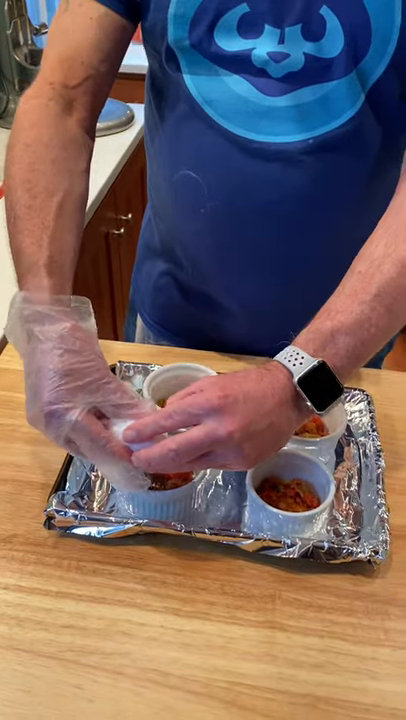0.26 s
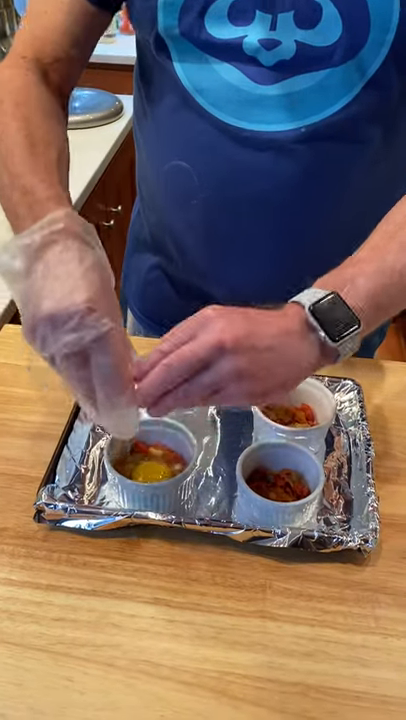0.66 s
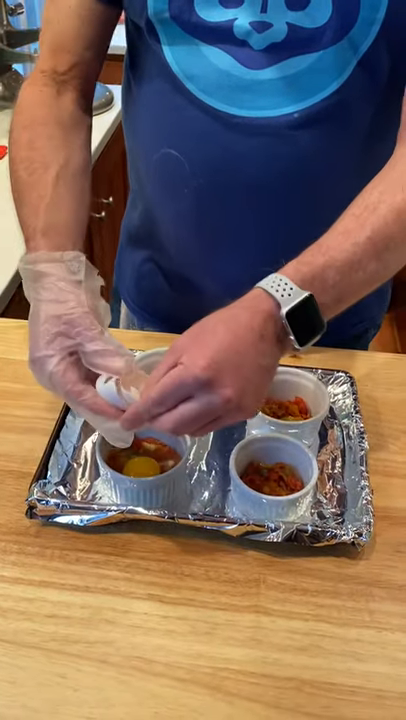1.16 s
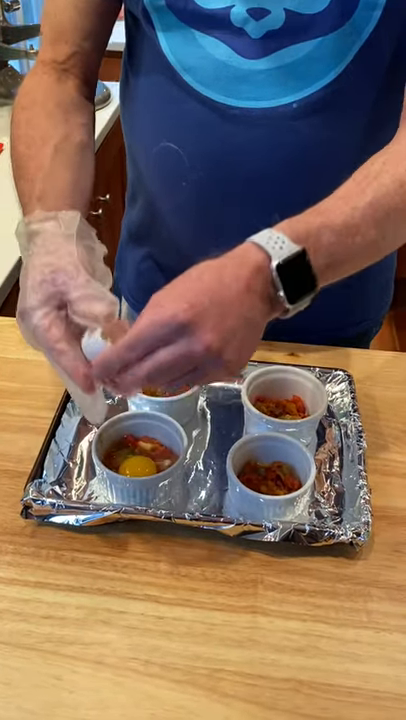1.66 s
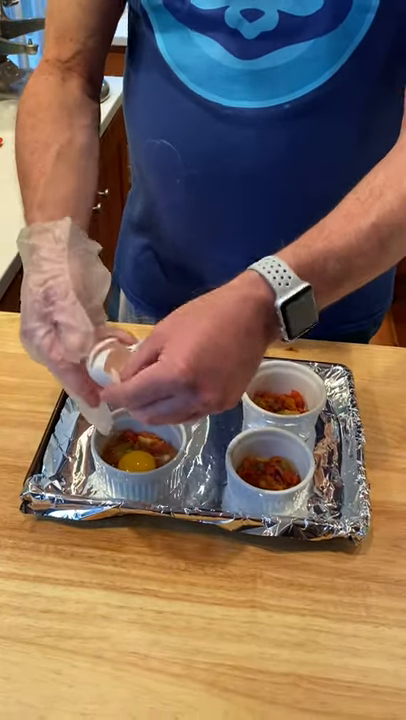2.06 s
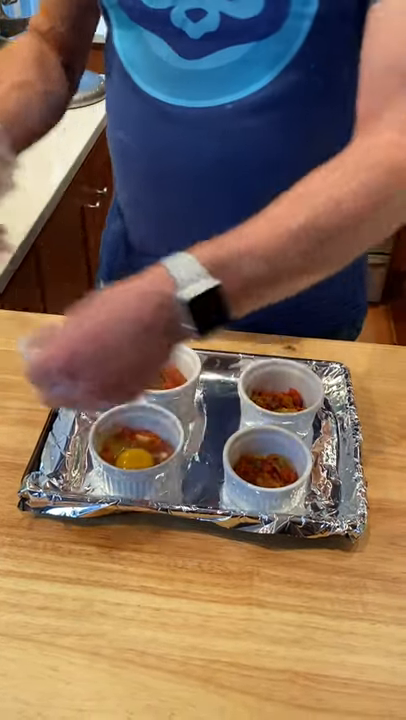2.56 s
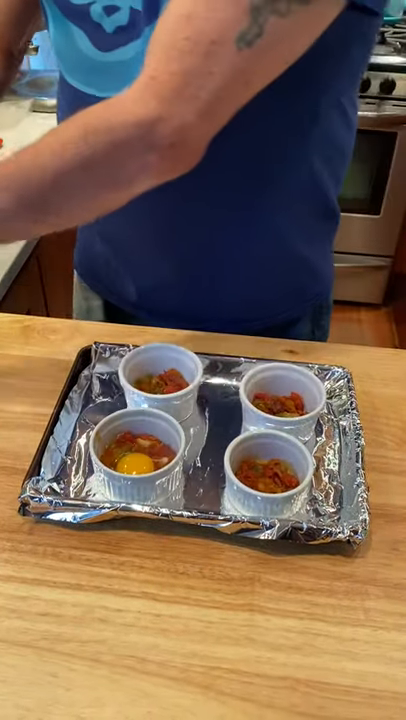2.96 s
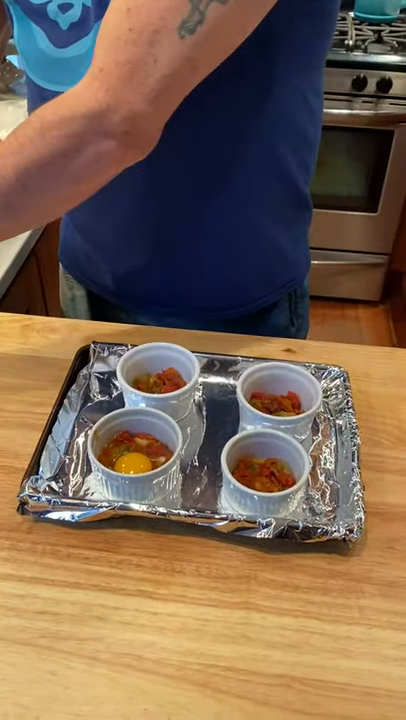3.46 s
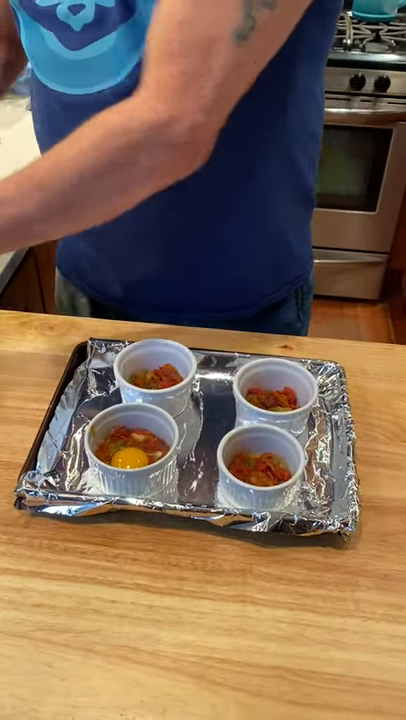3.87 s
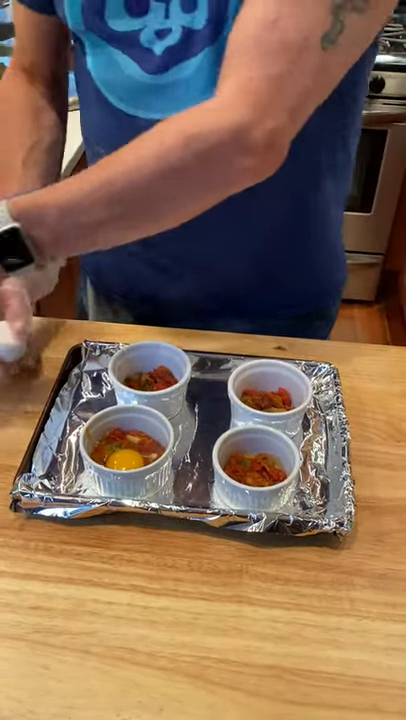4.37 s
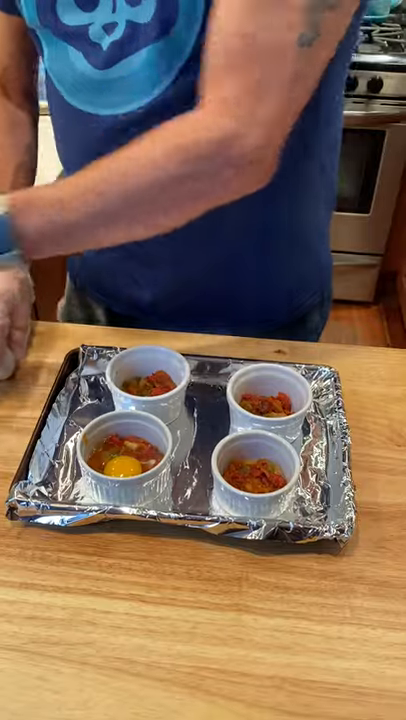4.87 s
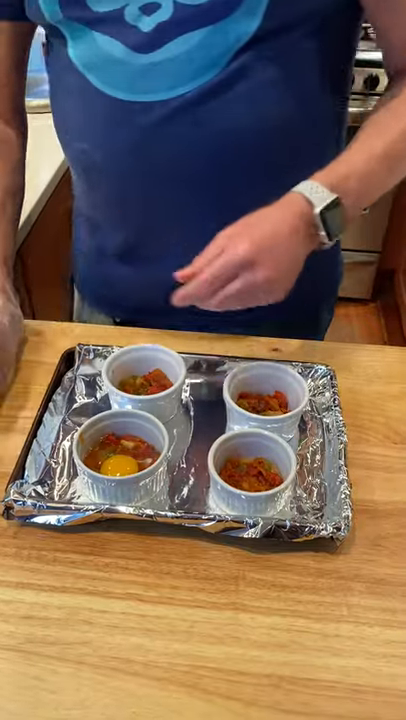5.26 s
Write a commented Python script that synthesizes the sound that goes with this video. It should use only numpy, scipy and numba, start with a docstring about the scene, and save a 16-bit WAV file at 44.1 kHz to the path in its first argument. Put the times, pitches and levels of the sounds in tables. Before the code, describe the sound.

Brittle shell crackles and a wet, rising squelch with tiny bubble pops open the scene, thinning into isolated ticks and thin plastic crinkle. After a lull the shell drops hollowly into a bowl amid cloth and glove rustle. Shell crackles again, an egg is tapped on the wooden counter, then breaks loudly at the end. Close, dry stereo pickup with short kitchen echoes over soft air noise and fridge hum.

```python
"""Opening eggs in a small kitchen

Close by, shell and glove snap (bursts ringing a hollow), egg white slurps and pops (moving resonances, rising
tones), shell drops in a bowl, and the next egg is tapped and broken on a wooden counter (struck modes).
Glove and sleeve rustle (noise and grains), the cabinet is bumped; a fridge hums (wavering sines) under room tone.
Short echoes follow the close sounds; a two-port microphone hears it all."""
import sys
import numpy as np
from scipy import signal
from scipy.fft import rfft, irfft, next_fast_len
from scipy.io import wavfile
from numba import njit

SR = 44100
rng = np.random.default_rng(int(sys.argv[2]) if len(sys.argv) > 2 else 0)


def wrap_up_sound(samples):
    """Save the sound to the file named by the first command line argument, as 16-bit audio."""
    columns = np.atleast_2d(samples).T
    # keep every value between -1 and 1, then stretch to whole-number steps
    tamed = np.clip(columns, -1, 1)
    steps = np.round(tamed * 32767).astype(np.int16)
    wavfile.write(sys.argv[1], SR, steps)


N = 243348

# Shell and glove snapping close to the microphone. Each row: time in seconds, ring peak in dB, ring pitch in Hz,
# crack peak in dB, time in seconds for the trail of smaller fractures to fall 60 dB.
SHELL_SNAPS = [(0.028, -35, 1790, -29.5, 0.011), (0.062, -35, 2050, -23, 0.02),
               (0.075, -33, 1800, -22, 0.021), (0.092, -20, 2060, -16.5, 0.048),
               (0.173, -23.5, 1900, -17.5, 0.012), (.176, -31, 1000, -41, .04),
               (0.206, -38, 1800, -20, 0.042), (0.246, -33, 1780, -21.5, 0.05),
               (0.2545, -27, 2900, -22.5, 0.043), (0.274, -21.5, 1600, -25, 0.014),
               (.281, -32, 1300, -28, 0.02), (0.416, -41, 3000, -26.5, 0.022),
               (0.44, -40, 3000, -24, 0.026), (0.477, -37, 2900, -20.5, 0.024),
               (0.7285, -37.5, 1680, -16.5, 0.046), (0.893, -33.5, 3070, -28.5, 0.058),
               (0.948, -60, 2210, -27, 0.036), (0.967, -37, 3080, -24, 0.12),
               (1.0226, -33.5, 2110, -43, 0.046), (1.0663, -48, 2130, -53, .02),
               (1.09, -42.5, 4430, -50, 0.049), (1.1646, -45, 2350, -51, 0.039),
               (1.338, -41.5, 4500, -48, 0.038), (1.403, -47, 4470, -48, 0.018),
               (1.5034, -62, 902, -34.5, 0.041), (1.8754, -51, 1650, -34.5, 0.084),
               (1.981, -46.5, 5030, -49, .015), (2.023, -65, 5000, -34.5, 0.015),
               (2.059, -52, 4570, -26, 0.024), (2.8243, -61, 3340, -30, 0.012),
               (3.303, -38, 2150, -62, 0.039), (3.466, -43, 1020, -57, 0.048),
               (3.498, -32, 1540, -56, 0.084), (3.6061, -37, 2220, -38, 0.047),
               (3.664, -40.5, 1300, -42, 0.075), (4.5998, -29.5, 2300, -24, 0.1),
               (4.604, -40, 2200, -26, .06), (4.628, -52, 2100, -39, 0.033),
               (4.6572, -25.5, 2200, -20.5, 0.05), (4.6916, -24, 2360, -24, 0.06),
               (4.695, -25.5, 3830, -23, .05), (4.702, -35, 2130, -36, 0.04),
               (4.715, -32, 2300, -35, 0.072), (4.7412, -48, 1030, -33, 0.023),
               (4.772, -41, 4500, -46, .03), (4.88, -48, 1040, -26.5, 0.035),
               (4.947, -40, 1170, -48, 0.041), (5.2342, -8, 1113, -3.5, 0.02)]
HOLLOW_T60_S, FRACTURE_RISE_S, FRACTURES_PER_S = 0.0098, 0.0012, 2200


def snaps():
    """One sharp fracture amid a dying trail of smaller, uneven ones rings the shell's hollow and cracks in the treble."""
    out, t = np.zeros(N), np.arange(4000) / SR
    treble = signal.butter(1, [2600, 8000], "band", fs=SR)
    for s, ring_db, hz, crack_db, trail_t60 in SHELL_SNAPS:
        larger = rng.random(len(t)) < FRACTURES_PER_S / SR
        fractures = rng.standard_normal(len(t)) * (0.079 + 0.16 * larger)
        burst = fractures * from_db(-60 * t / trail_t60) * np.clip(t / FRACTURE_RISE_S, 0, 1)
        burst[int(FRACTURE_RISE_S * SR)] = 0.96     # the sharp fracture
        hollow = band(ring(burst, hz, HOLLOW_T60_S), hz * 0.5, hz * 2)
        crack = signal.lfilter(*treble, band(burst, 3500, 21000))
        start = max(s - FRACTURE_RISE_S, 0)
        add(out, hollow, start, ring_db)
        add(out, crack, start, crack_db)
    return out


# The egg breaking on the counter, a little to the right: a faint lead-in, the main crack, then weaker blows.
# Each row: time in seconds, peak in dB, contact in ms, time in ms for the chatter to fall 20 dB.
EGG_BREAKS = [(5.2313, -15.5, 0.051, 3.3), (5.236, -2.5, 0.049, 2.3), (5.241, -12.5, 0.31, 7.4),
              (5.251, -13.5, 0.24, 22), (5.264, -19.5, .25, 10)]
# Ringing of the full shell. Each row: pitch in Hz, relative level in dB, time in seconds to fall 60 dB.
EGG_MODES = [(890, -14.5, 0.042), (1083, -6.5, 0.048), (1190, -11, 0.036), (1380, -17, 0.051),
             (1780, -3, 0.01), (2300, -2, 0.011), (2980, -4.5, 0.011), (3055, -10, 0.021),
             (4940, -7.5, 0.0064)]
# close overtones: level in dB, low edge in Hz, high edge in Hz, time in seconds to fall 60 dB
EGG_RATTLE = (-11, 1000, 4500, 0.27)


def egg_break():
    """A faint lead-in, the main crack and weaker blows each sound the shell's short modes, a strong slap and a rattle."""
    out = np.zeros((2, N))
    for s, peak_db, contact_ms, chatter_ms in EGG_BREAKS:
        crack = struck(EGG_MODES, EGG_RATTLE, contact_ms, chatter_ms, slap_db=9.5)
        add(out, panned(crack, -4.8), s, peak_db)
    return out


# Blows on the wooden counter. Each row: time in seconds, peak in dB, contact in ms,
# time in ms for the chatter to fall 20 dB, left over right in dB.
COUNTER_KNOCKS = [(3.203, -35, 0.15, 13, -1), (3.387, -36.5, 0.095, 63, -2), (3.665, -30.5, 0.99, 11, -1.5),
                  (4.602, -36, 0.68, 21, -1.5), (4.741, -10, 0.25, 16, -0.5),
                  (4.751, -13.5, 0.5, 2.4, -2.5), (4.945, -32.5, 1, 17, 0), (5.238, -14, 0.26, 6.9, -0.5)]
# Ringing of the counter top. Each row: pitch in Hz, relative level in dB, time in seconds to fall 60 dB.
COUNTER_MODES = [(156, -1, 0.047), (240, -8.5, 0.43), (305, -1, 0.077), (372, -5.5, 0.06),
                 (481.6, 1.5, 0.051), (550, 0.5, 0.02), (633, -2.5, 0.083), (683, -2.5, 0.13),
                 (807, 2, 0.044), (867, -1, 0.059), (1085, -1, 0.07), (1450, -8, 0.051), (1800, -3, 0.049),
                 (2130, -10, 0.05), (2500, 1, 0.013), (2660, -14, 0.039), (3530, -13, .012)]
COUNTER_RATTLE = (-19.5, 1304, 3802, 0.97)      # as EGG_RATTLE


def counter_knocks():
    """Each blow drives the modes of the counter top, with a slap and a long rattle."""
    out = np.zeros((2, N))
    for s, peak_db, contact_ms, chatter_ms, pan_db in COUNTER_KNOCKS:
        blow = struck(COUNTER_MODES, COUNTER_RATTLE, contact_ms, chatter_ms, slap_db=4.0)
        add(out, panned(blow, pan_db), s, peak_db)
    return out


# Shell falling in the bowl, a little to the right. Each row: time in seconds, peak in dB, contact in ms.
SHELL_DROPS = [(3.05, -22, 0.29), (3.058, -12.5, 0.19), (3.064, -17.5, 0.18), (3.076, -20.5, 0.2),
               (3.087, -33, 0.25), (3.099, -29, 0.16), (3.15, -29.5, 0.13)]
# Ringing of the bowl. Each row: pitch in Hz, relative level in dB, time in seconds to fall 60 dB.
BOWL_MODES = [(299, -13, 0.094), (686, -12.5, 0.087), (932, -16.5, 0.27), (1067, -13, 0.052),
              (1183, 4, 0.068), (1410, -17, 0.07), (1624, -11, 0.035), (1893, -3.5, 0.039),
              (2100, -4.5, 0.019), (2430, -9, 0.033), (2670, -16, 0.031), (3250, -34, 0.027),
              (3680, -22, 0.029)]
BOWL_RATTLE = (-11.5, 998, 3200, 0.38)      # as EGG_RATTLE


def shell_drops():
    """Light, brief contacts drive the bowl's modes under a strong slap."""
    out = np.zeros((2, N))
    for s, peak_db, contact_ms in SHELL_DROPS:
        blow = struck(BOWL_MODES, BOWL_RATTLE, contact_ms, chatter_ms=15.6, slap_db=14.0)
        add(out, panned(blow, -3.2), s, peak_db)
    return out


MODE_SPLIT, TWIN_DB = 0.035, -4     # each mode's near twin: largest distance as a share of its pitch, and level


def struck(modes, rattle, contact_ms, chatter_ms, slap_db):
    """A rounded contact, chattering briefly, is heard as a slap, drives every mode and sets off a rattle."""
    t = np.arange(SR // 3) / SR
    chatter = rng.standard_normal(len(t)) * from_db(-20 * t / (chatter_ms / 1000))
    force = chatter * [[0.06], [0.16]]      # the chatter drives the modes less than the slap
    force[:, 0] = 1                         # the first contact
    top_hz = min(500 / contact_ms, 9000)    # a longer contact is duller
    push, slap = band(force, 164, top_hz)
    rings = 0
    for k, (hz, db, t60) in enumerate(modes):
        twin_hz = hz * (1 + MODE_SPLIT * rng.uniform(-1, 1))
        pair = ring(push, hz, t60) + from_db(TWIN_DB) * ring(push, twin_hz, t60)
        rings = rings + (-1) ** k * from_db(db) * pair
    rattle_db, low_hz, high_hz, t60 = rattle
    overtones = band(band(rng.standard_normal(len(t)), low_hz, high_hz), low_hz, high_hz)
    shaking = overtones * from_db(rattle_db - 60 * t / t60) * np.clip(t / 0.00073, 0, 1)
    shaking = shaking * np.abs(rings).max() * min(top_hz / high_hz, 1)
    return rings + from_db(slap_db) * slap + shaking


# Two passages of egg white sucking out of the shell. Each row: time in seconds, level in dB, cavity pitch in Hz.
SLURP_PASSAGES = [
    [(.15, -93, 1000), (.175, -41.5, 1040), (.22, -45, 1270), (.26, -60, 1600), (.285, -43, 1120),
     (.33, -57, 1260), (.355, -62, 1510), (.38, -42, 1750), (.4, -58, 1750), (.43, -49, 1940),
     (.46, -63, 2130), (.52, -62, 2720), (.6, -60, 2740)],
    [(.95, -44.5, 2270), (1.02, -53.5, 2030), (1.1, -50, 2440), (1.21, -59.5, 1900), (1.28, -46, 1850),
     (1.36, -52.5, 1770), (1.44, -67, 1770), (1.5, -61, 1750)],
]
UPPER_RATIO, UPPER_DB = 2.9, -28    # second resonance of the cavity


def slurp():
    """Small wet pops sound the air cavity, whose pitch moves as the shell empties."""
    out = 0
    for rows in SLURP_PASSAGES:
        level_db, hz = in_time(rows)
        clicks = grains(600 * from_db(4.5 * drift(25)), spread_db=4.5)
        hz = hz * from_db(1.02 * drift(28))
        lower = moving_resonance(clicks, hz, 330.0, SR)
        upper = moving_resonance(clicks, UPPER_RATIO * hz, 280.0, SR)
        wet = rms_one(lower + from_db(UPPER_DB) * upper)
        sounding = in_time(rows, outside=0)[1] > 0
        out = out + wet * from_db(level_db) * sounding
    return out


@njit
def moving_resonance(x, hz, width_hz, sr):
    """Two-pole resonance whose centre follows hz."""
    out, r = np.zeros(len(x)), np.exp(-np.pi * width_hz / sr)
    for i in range(2, len(x)):
        drive = (1 - r * r) / 2 * (x[i] - x[i - 2])
        out[i] = drive + 2 * r * np.cos(2 * np.pi * hz[i] / sr) * out[i - 1] - r * r * out[i - 2]
    return out


# Air bubbles bursting in the egg white. Each row: middle in seconds, peak in dB, mid pitch in Hz, length in ms.
BUBBLES = [(0.3432, -39.5, 1180, 12), (0.369, -37, 1600, 6.4), (0.374, -26, 1730, 3.05),
           (.380, -29.5, 1790, 4), (0.4133, -26.5, 1890, 5), (0.4168, -29, 1840, 4.1),
           (.429, -33, 1850, 3.6), (.435, -28, 1830, 5), (.4415, -43, 1980, 2.7), (.4465, -31, 2100, 5),
           (.454, -38, 2030, 2.8), (.4775, -25.5, 2300, 3.5), (.519, -41, 2540, 10), (1.251, -48, 1700, 8),
           (1.2738, -36, 1800, 7.24), (1.294, -37, 1740, 4.94), (1.338, -40, 1650, 9.8),
           (1.348, -35, 1820, 6.2), (1.354, -37, 1780, 5.1), (1.368, -42, 1700, 8), (1.38, -38, 1800, 5),
           (1.404, -44, 1670, 3.6)]
POP_RISE, POP_UPPER_RATIO, POP_UPPER_DB = 0.33, 1.55, -12   # climb as a share of the pitch, and an overtone


def pops():
    """Each bubble swells and dies within a few ms, climbing in pitch, with a weaker overtone."""
    out = np.zeros(N)
    for s, peak_db, hz, length_ms in BUBBLES:
        u = np.arange(0, 1, 1000 / (length_ms * SR))    # 0 to 1 through the pop
        turns = np.cumsum(hz * (1 + POP_RISE * (u - 0.5))) / SR
        start, upper_start = rng.random(2)
        tone = np.sin(2 * np.pi * (start + turns))
        overtone = np.sin(2 * np.pi * (upper_start + POP_UPPER_RATIO * turns))
        pop = np.sin(np.pi * u) ** 2 * (tone + from_db(POP_UPPER_DB) * overtone)
        add(out, pop, s - length_ms / 2000, peak_db)
    return out


# Soft bumps of hand and hip on the cabinet. Each row: time in seconds, peak in dB, boom in Hz,
# time in seconds to fall 60 dB.
CABINET_BUMPS = [(1.908, -34, 28, 0.21), (1.904, -33.5, 58, 0.11), (1.911, -34, 255, 0.21),
                 (2.387, -35.5, 270, 0.075), (2.881, -37.5, 142, 0.72), (3.069, -27.5, 164, 0.092),
                 (3.144, -36, 143, 0.44), (3.389, -34.5, 142, 0.044), (4.762, -34, 105, 0.47),
                 (5.249, -28, 78, 0.035)]


def bumps():
    """Each bump is a dying burst of noise in a band around its boom."""
    out, t = np.zeros(N), np.arange(SR // 3) / SR
    for s, peak_db, hz, t60 in CABINET_BUMPS:
        burst = rng.standard_normal(len(t)) * from_db(-60 * t / t60)
        add(out, band(burst, hz * 0.66, hz * 1.35), s, peak_db)
    return out


# Colour of the crinkling plastic. Each row: frequency in Hz, relative level in dB per Hz.
CRINKLE_COLOUR = [(850, -74), (1200, 1.5), (2500, 10.5), (4500, 10), (7000, 3), (10000, 1), (13000, 4),
                  (16000, -32)]


def rustle():
    """Thin plastic crinkles in patches and short pitched grains, beside duller noise, mostly rubbing skin and cloth."""
    bright, dull = rustle_gains()
    patch_db, rub_db = 1.2 * drift(12), 2.5 * drift(6)
    hiss = rms_one(diffuse(N, lambda hz: from_db(at_hz(CRINKLE_COLOUR, hz) + patch_db + 4.54 * drift(21))))
    clicks = grains(900 * from_db(patch_db), spread_db=0)
    pitches = np.geomspace(2200, 11000, num=9)
    dealt = rng.integers(len(pitches), size=N)      # each click goes to one pitch
    crinkle = 0
    for k, hz in enumerate(pitches):
        crinkle = crinkle + from_db(at_hz(CRINKLE_COLOUR, hz)) * ring(clicks * (dealt == k), hz, 28.0 / hz)
    rub = rms_one(band(rng.standard_normal((2, N)), 400, 1490)) * from_db(rub_db)
    return bright * (hiss + 0.54 * rms_one(band(crinkle, 1900, 14000))) + dull * rub


# Rustling of glove and sleeve, and dull noise trailing the shell drop and the counter knock.
# Each row: start of the hold in seconds, its length in seconds, crinkle gain in dB, dull noise gain in dB.
RUSTLES = [(0.0, 0.0042, -45, -60), (0.094, 0.071, -48, -65), (0.177, 0.032, -39, -69),
           (0.237, 0.036, -42, -56.5), (0.368, 0.084, -54, -65), (0.732, 0.16, -55.5, -63),
           (0.868, 0.15, -55, -63.5), (1.084, 0.1, -55.5, -70), (1.232, 0.19, -57.5, -68),
           (1.562, 0.28, -69, -74), (1.909, 0.012, -61, -51.5), (1.997, 0.12, -85, -86),
           (2.39, 0.046, -63, -55.5), (2.619, 0.045, -53.5, -52), (2.836, 0.055, -49, -52.5),
           (2.908, 0.13, -51, -48), (3.057, 0.11, -58.5, -45), (3.188, 0.16, -56, -58),
           (3.434, 0.28, -61.5, -55), (3.691, 0.21, -54.5, -63.5), (3.952, 0.24, -58, -62.5),
           (4.3, 0.3, -84, -83), (4.537, 0.091, -53, -75), (4.606, 0.11, -44, -64),
           (4.734, 0.04, -47.5, -42), (4.949, 0.021, -51.5, -48)]
RUSTLE_ATTACK_S, CRINKLE_FADE_DB_PER_S, DULL_FADE_DB_PER_S = 0.019, 204, 143


def rustle_gains():
    """Gains of crinkle and dull noise: each rustle sets in quickly, holds, then fades; powers add."""
    power, t = np.zeros((2, N)), np.arange(N) / SR
    for s, length, crinkle_db, dull_db in RUSTLES:
        after = np.maximum(t - s - length, 0)
        gain = from_db([crinkle_db - CRINKLE_FADE_DB_PER_S * after, dull_db - DULL_FADE_DB_PER_S * after])
        attack = np.clip((t - s) / RUSTLE_ATTACK_S + 1, 0, 1)
        power += (attack * gain) ** 2
    return np.sqrt(power)


# Echo of the small kitchen. Each row: frequency in Hz, time in seconds to fall 60 dB, relative echo level in dB.
KITCHEN_ECHO = [(100, 0.32, 5.5), (487, 0.36, 3.5), (1600, 0.36, 4.5), (3730, 0.35, -2), (8800, 0.29, -0.5)]


def kitchen(x):
    """Diffuse echoes that swell in over about 2 ms and die band by band."""
    t, table = np.arange(SR // 2) / SR, np.array(KITCHEN_ECHO)

    def decay(hz):
        """Gain of one band through time, falling steadily in dB."""
        return from_db(at_hz(table[:, [0, 2]], hz) - 60 * t / at_hz(table, hz))

    echoes = diffuse(len(t), decay) * np.clip(t / 0.0019, 0, 1) ** 2
    echoes = echoes / np.sqrt(np.sum(echoes ** 2) / 2)
    return signal.fftconvolve(x[None], echoes, axes=1)[:, :N]


# Colour of the air noise in the room. Each row: frequency in Hz, relative level in dB per Hz.
AIR_COLOUR = [(25, -57), (45, -22), (62, -6.5), (130, -7.5), (260, -9), (500, -12.5), (1000, -21),
              (2000, -24.5), (4500, -26.5), (8000, -35.5), (12000, -32.5), (16000, -56)]
# Hum of the fridge. Each row: pitch in Hz, rms waver of the pitch in Hz, level in dB around which it drifts.
FRIDGE_HUM = [(59, 1.9, -55.5), (79.6, 2.77, -56.5), (119.7, 5.02, -59.5), (152.4, 7.6, -61.5),
              (245.3, 13, -60.5)]
AIR_DB = -53


def room_tone():
    """Steady air noise with a fridge's hum: sines wavering in pitch and level."""
    air = rms_one(diffuse(N, lambda hz: from_db(at_hz(AIR_COLOUR, hz) + 1.9 * drift(6.0))))
    hum = 0
    for hz, waver_hz, db in FRIDGE_HUM:
        turns = np.cumsum(hz + waver_hz * drift(5.955)) / SR
        hum = hum + from_db(db + 2.7 * drift(15.5)) * rms_one(np.sin(2 * np.pi * turns))
    return from_db(AIR_DB) * air + hum


# How alike diffuse sound is at the two ports. Each row: frequency in Hz, left-right correlation.
PORT_LIKENESS = [(60, 1), (150, 1), (300, 0.95), (600, 0.64), (1000, 0.017), (2000, 0.033), (4000, 0.65)]


def diffuse(size, shape):
    """Half-octave bands of stereo noise, most alike in the bass; shape(hz) is each band's gain."""
    out, edges = 0, 22 * 2 ** np.arange(0, 10, 0.5)
    white = rng.standard_normal((2, 2, size))
    for k, (low, high) in enumerate(zip(edges, edges[1:])):
        mid, side = band(white[k % 2], low, high)   # neighbouring bands use separate noise
        hz = np.sqrt(low * high)
        alike = at_hz(PORT_LIKENESS, hz)
        out = out + shape(hz) * (np.sqrt(1 + alike) * mid + np.sqrt(1 - alike) * side * [[1], [-1]])
    return out


def from_db(db):
    """Gain of a level in dB."""
    return 10 ** (np.asarray(db) / 20)


def rms_one(x):
    """Scaled to rms 1."""
    return x / np.sqrt(np.mean(x ** 2) + 1e-20)


def panned(x, left_over_right_db):
    """A mono sound on two channels that differ in level."""
    return x * from_db([[left_over_right_db / 2], [-left_over_right_db / 2]])


def in_time(rows, outside=None):
    """Columns of a curve table, sample by sample."""
    s, *columns = np.transpose(rows)
    return [np.interp(np.arange(N) / SR, s, c, outside, outside) for c in columns]


def at_hz(points, hz):
    """Second column of a table, read on a log-frequency axis."""
    points = np.array(points)
    return np.interp(np.log(hz), np.log(points[:, 0]), points[:, 1])


def band(x, low_hz, high_hz):
    """Band-pass made from a second-order prototype."""
    return signal.sosfilt(signal.butter(2, [low_hz, high_hz], "band", fs=SR, output="sos"), x)


def drift(rate_hz):
    """Slow random curve of rms 1: noise made at a 40th of the sample rate, low-passed near rate_hz, then spread
    over every sample."""
    r = np.exp(-80 * np.pi * rate_hz / SR)
    slow = signal.lfilter([1], [1, -2 * r, r * r], rng.standard_normal(N // 40 + 2002))[2000:]
    return np.interp(np.arange(N) / 40, np.arange(len(slow)), rms_one(slow))


def ring(x, hz, t60):
    """A unit click sets a sine of height 1 ringing, falling 60 dB in t60 seconds."""
    r, w = from_db(-60 / (t60 * SR)), 2 * np.pi * hz / SR
    return signal.lfilter([0, np.sin(w)], [1, -2 * r * np.cos(w), r * r], x + 1e-18)


def grains(per_s, spread_db):
    """Random clicks of either sign, uneven in size when spread_db is above 0."""
    sizes = from_db(spread_db * np.minimum(rng.exponential(1, N), 4)) * rng.choice([-1, 1], N)
    return sizes * (rng.random(N) < per_s / SR)


def add(out, sound, s, peak_db):
    """Mixes a short sound in at a time and peak level."""
    i = round(s * SR)
    scaled = from_db(peak_db) * sound / np.abs(sound).max()
    out[..., i:i + sound.shape[-1]] += scaled[..., :N - i]


WET_DB = -7.5


def scene():
    """Close sounds with their echoes, over the rustling and the room."""
    close = snaps() + egg_break() + counter_knocks() + shell_drops() + slurp() + pops() + bumps()
    return close + from_db(WET_DB) * kitchen(close.mean(axis=0)) + rustle() + room_tone()


# Right channel against the left; above about 5 kHz the phase falls steadily with frequency. Each row: frequency
# in Hz, phase in rad.
RIGHT_PHASE = [(0, 0), (200, .05), (700, .9), (1300, -.4), (2300, -2.2), (3600, -1.1), (5200, -.9),
               (17100, -13.1)]
# Right port's level. Each row: frequency in Hz, right over left in dB.
RIGHT_LEVEL = [(100, -0.76), (300, 0.37), (800, 1), (2000, 0), (5000, -1.5), (9000, 0.84)]
LOW_CUT_HZ, CUTOFF_HZ = 32.4, 17100


def record(dry):
    """The two channels differ in phase and level, and above about 5 kHz the right carries the left's sound;
    both ends are cut."""
    size = next_fast_len(N + 1024)
    left, right = rfft(dry, size)
    hz = np.arange(1, len(left) + 1) * SR / size    # starts above 0 for the log axis
    shared = np.interp(hz, [5030, 6160], [0, 1])    # the left's share of the right channel
    right = np.sqrt(1 - shared ** 2) * right + shared * left
    right = right * from_db(at_hz(RIGHT_LEVEL, hz))
    right = right * np.exp(1j * np.interp(hz, *np.transpose(RIGHT_PHASE)))
    out = irfft(np.array([left, right]), size)[:, :N]
    out = signal.sosfilt(signal.butter(4, LOW_CUT_HZ, "high", fs=SR, output="sos"), out)
    return signal.sosfilt(signal.cheby2(12, 70, CUTOFF_HZ, fs=SR, output="sos"), out)


dry = scene()
out = record(dry)
wrap_up_sound(out)
```